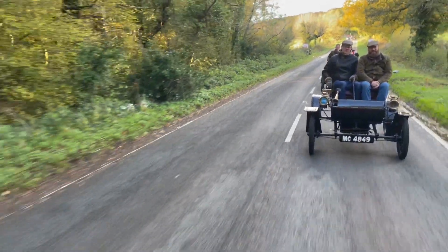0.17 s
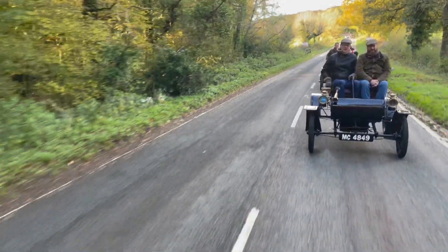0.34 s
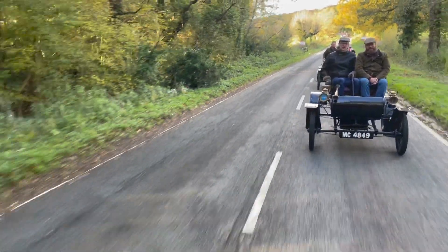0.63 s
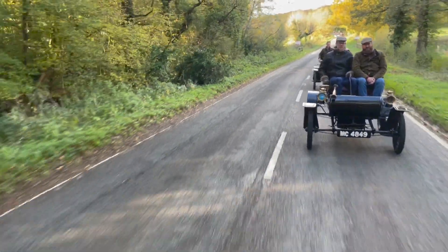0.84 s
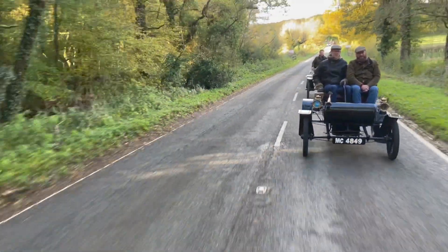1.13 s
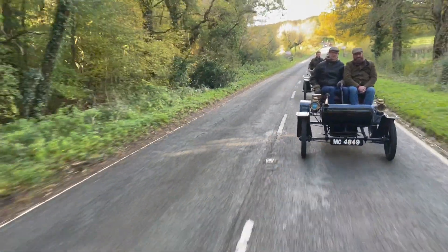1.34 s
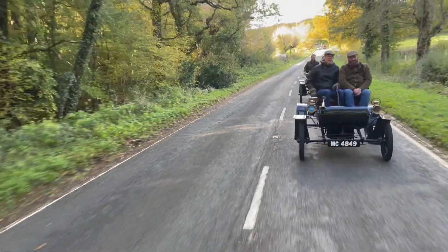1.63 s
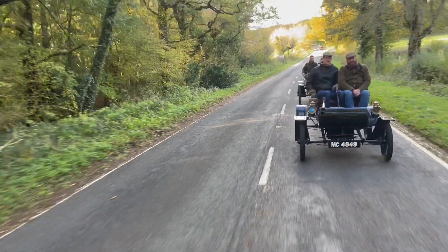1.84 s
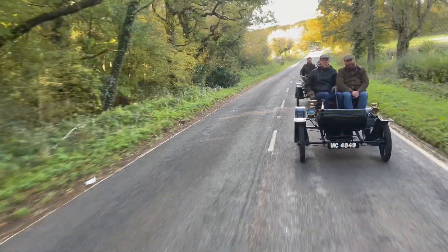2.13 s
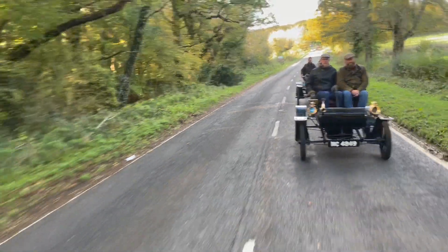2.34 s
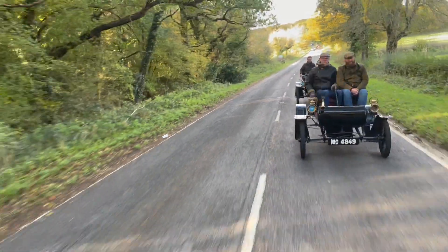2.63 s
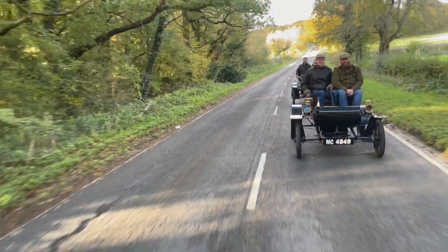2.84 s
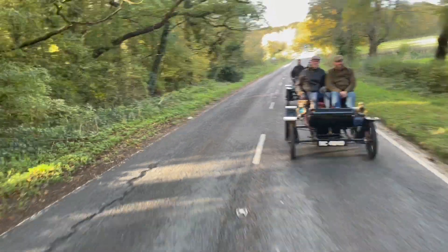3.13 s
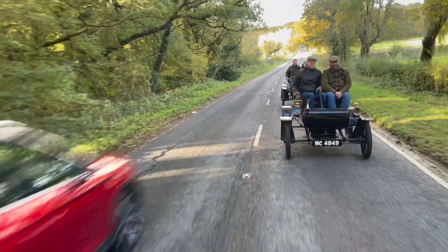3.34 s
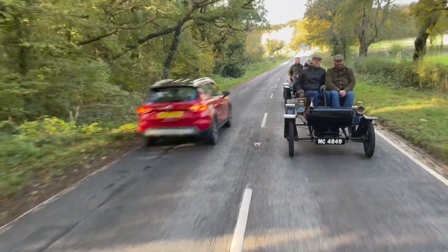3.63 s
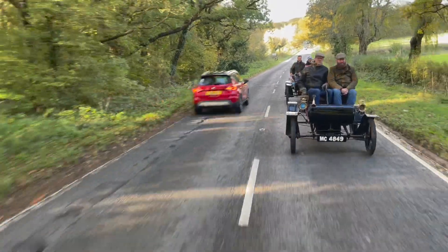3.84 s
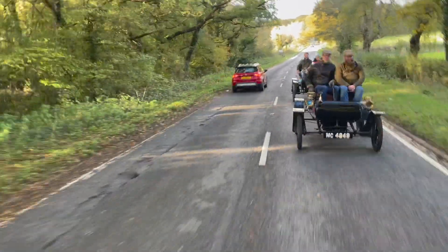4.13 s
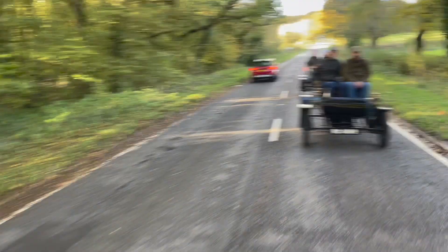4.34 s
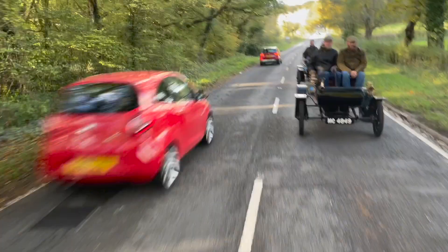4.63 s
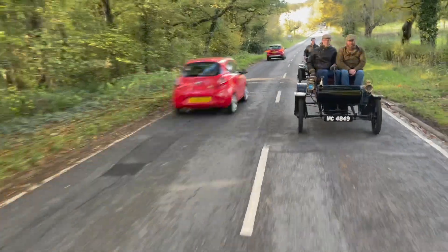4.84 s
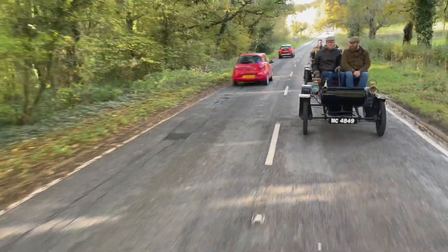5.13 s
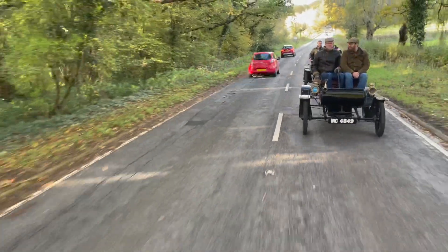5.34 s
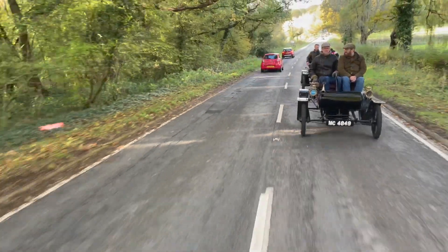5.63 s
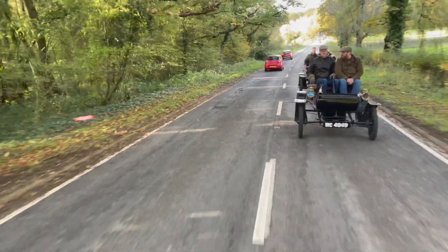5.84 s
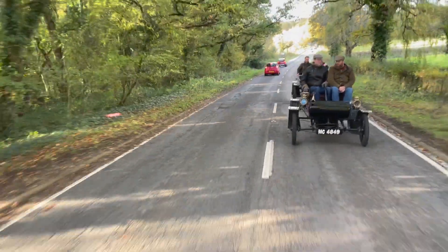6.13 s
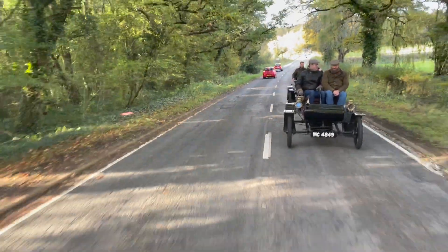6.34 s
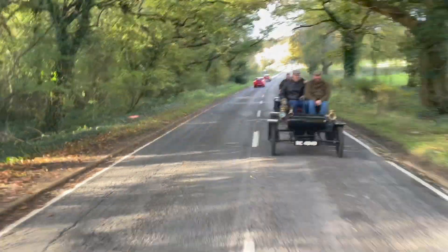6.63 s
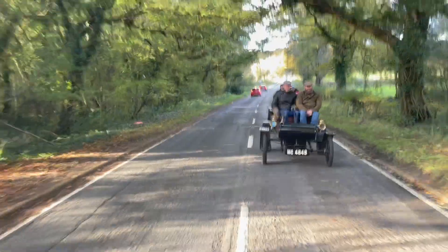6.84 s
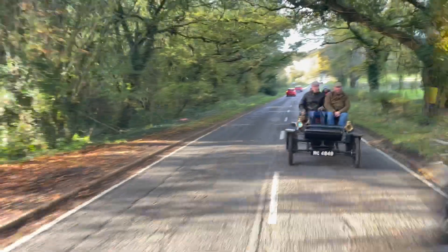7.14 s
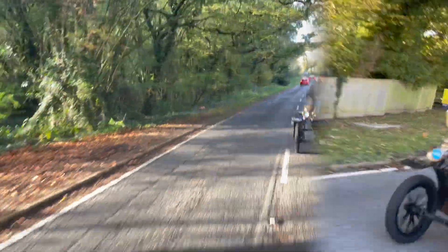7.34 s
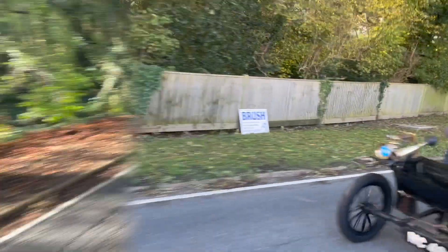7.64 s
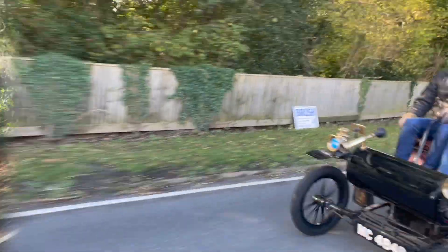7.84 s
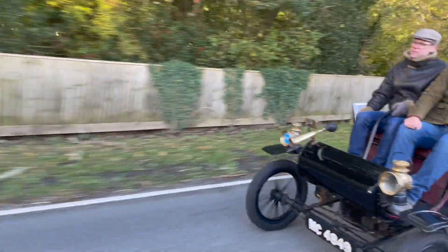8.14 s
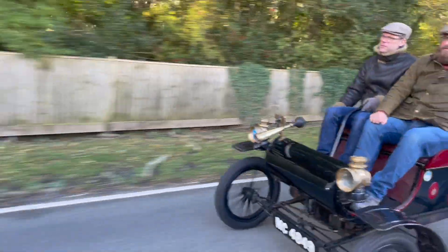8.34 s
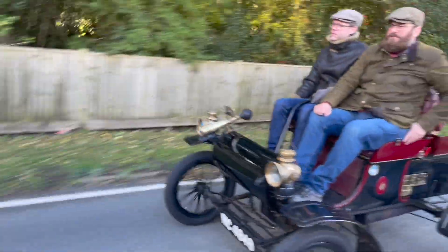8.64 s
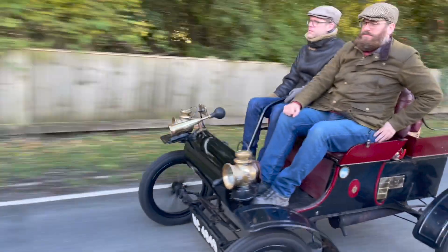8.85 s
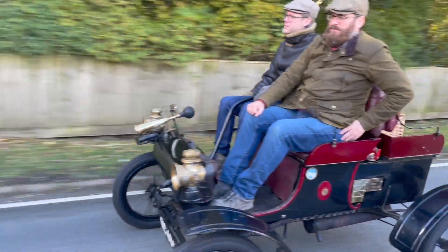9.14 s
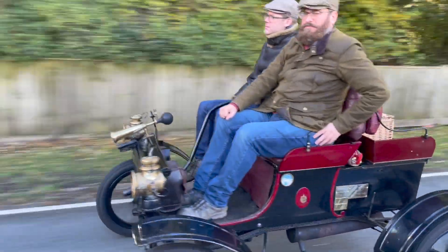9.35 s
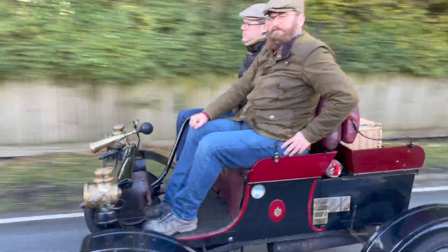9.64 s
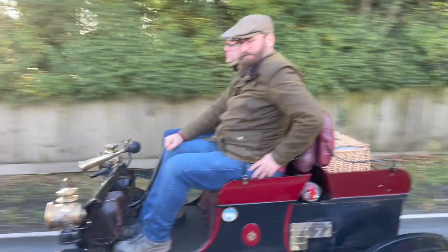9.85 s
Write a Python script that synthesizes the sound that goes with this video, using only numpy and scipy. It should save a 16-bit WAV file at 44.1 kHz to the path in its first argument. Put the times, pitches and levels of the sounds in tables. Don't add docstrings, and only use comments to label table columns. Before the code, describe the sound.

Fast hollow exhaust popping and heavy wind rumble on board an old open car, two passing whooshes, then close crisp chuffs from another vintage engine.

```python
import sys
import numpy as np
from scipy import signal
from scipy.fft import rfft, irfft, next_fast_len
from scipy.io import wavfile
from scipy.ndimage import uniform_filter1d, minimum_filter1d, map_coordinates

SR = 44100
rng = np.random.default_rng(int(sys.argv[2]) if len(sys.argv) > 2 else 0)


def natural_amplitude(level_db):
    exponent = np.asarray(level_db, float) / 20
    return 10 ** exponent


def dump(signal):
    limited = np.clip(np.atleast_2d(signal).T, -1, 1)
    pcm = np.round(limited * 32767).astype(np.int16)
    wavfile.write(sys.argv[1], SR, pcm)


N = 440559

# t/s, firings so far, ring level/dB of the low, high and middle pipe modes
OWN_FIRINGS = [
    [(0.0, -0.45, -27.5, -32, -36), (1.0, 14.47, -30, -32, -33), (2.0, 29.32, -26, -25.5, -36),
     (3.0, 43.98, -30, -27, -37), (4.0, 58.47, -31, -31, -32), (5.0, 72.84, -32, -33, -34),
     (6.0, 87.08, -32, -33, -34), (7.0, 101.29, -34, -33, -36), (7.5, 108.38, -42, -39, -41)],
    [(7.9, 0, -49, -50, -56), (8.2, 4.28, -35, -45, -50), (8.85, 13.55, -34, -42, -48),
     (9.1, 17.11, -46, -44, -50), (9.99, 29.8, -46, -48, -54)],
]
# f/Hz, width/Hz, left-right level/dB, left lead/rad
PIPE_MODES = [
    (895.5, 66, 2, .5),
    (1369, 62, -2, 1.4),
    (1286, 60, -3, 1.1),
]

# t/s, exhaust strokes so far
STROKES = [
    [(0.126, 0), (1.421, 8), (2.74, 16), (4.082, 24), (4.935, 29), (6.162, 36), (6.872, 40), (7.425, 43.01)],
    [(7.561, 0), (7.841, 2), (8.529, 7), (8.935, 10), (9.478, 14), (9.879, 17.01)],
]
# t/s, blast level/dB
NEARNESS = [(0, -36.5), (2.1, -35), (3.1, -42), (4.7, -39), (5.7, -38), (6.7, -41.5), (7.4, -43.5),
            (7.9, -25), (8.12, -23.5), (8.5, -20.5), (9.35, -18), (9.7, -17.5), (9.99, -21)]
# t/s, blast level/dB over the nearness, low bark level/dB
LOADS = [(7.558, 3, -9), (7.698, 2.5, -15), (7.844, 2.5, -9), (7.976, 0, -21), (8.116, 2, -18),
         (8.253, 0.5, -12), (8.392, 0, -9), (8.528, -1, -18), (8.664, -2.5, -6), (8.8, -1, -16),
         (8.937, -0.5, -9), (9.072, -2, -13), (9.208, -3, -7), (9.341, 1, -6), (9.479, -3, -14),
         (9.611, -1, -15), (9.744, -3, -6.5), (9.878, 0, -9)]
# f/Hz, density/dB per Hz
CHUFF = [(400, -11), (900, 1.5), (1600, -4.5), (2300, 4), (3500, -1.5), (5000, 1.5), (6500, -4),
         (8300, 2.5), (11500, -12), (15500, -9)]
# f/Hz, density/dB per Hz
BARK = [(700, -40), (1200, -3), (1900, -4), (2400, -7.5), (3500, 1), (6000, -48)]
STROKE_SCATTER_DB = .3

# t/s, level/dB
WIND = [(0.0, -18.5), (0.35, -23.5), (0.92, -16.5), (1.6, -19.5), (2.1, -20), (2.87, -21), (3.08, -13.5),
        (3.45, -18), (4.3, -19), (5.3, -21), (6.05, -18.5), (6.6, -18), (6.82, -19), (7.1, -24),
        (8.3, -22.5), (8.62, -18.5), (9.1, -19), (9.99, -21.5)]
# t/s, half length/s, buffet level/dB, flutter level/dB
GUSTS = [(0.286, 0.033, 3, 14), (1.296, 0.03, 6, 10), (1.445, 0.083, -4.5, 8), (1.758, 0.019, 5, 14),
         (1.986, 0.1, 3, 4), (2.144, 0.049, 6.5, 10), (2.247, 0.021, 9.5, 2), (3.006, 0.034, -2, -13),
         (3.515, 0.044, 8.5, 10.5), (4.197, 0.026, 11, -11), (4.957, 0.25, 1, -1), (5.358, 0.088, 7, 8),
         (5.44, 0.052, -2.5, -5), (5.562, 0.041, 5.5, 6), (5.713, 0.064, 5, 7), (5.832, 0.027, -2, -13),
         (5.9, .04, 3.5, 4), (5.918, 0.0097, -5, 10), (6.145, 0.017, 8, 5), (6.18, 0.026, -10, -8),
         (6.217, 0.027, -1, 9), (6.287, 0.033, -19, -17), (6.33, 0.024, 5, 4), (6.523, 0.053, 2.5, 9.5),
         (6.688, 0.036, -6, -3), (6.742, 0.018, 5, 8), (7.155, 0.05, 2, 1), (8.583, .05, 4.5, 5),
         (8.738, 0.028, -3, -13), (8.814, 0.024, 4, -7)]
# f/Hz, density/dB per Hz
BUFFET = [(25, -45), (48, -6.5), (68, 1), (95, -2), (125, -5.5), (200, -8), (350, -17.5), (700, -27.5),
          (1500, -58.5)]
# f/Hz, density/dB per Hz
FLUTTER = [(100, -24), (250, 5.5), (500, 4.5), (750, -12), (1100, -48), (2500, -72)]
FLUTTER_DB = -6
# t/s, peak level/dB, f/Hz, crack level/dB
SLAPS = [(0.277, 1, 314, -25), (1.839, -9.5, 323, -9), (2.112, 2, 345, -7), (2.23, -5, 153, -18),
         (3.131, -6, 180, -27), (3.205, -5.5, 367, -27), (3.467, -7.5, 448, -14), (3.556, 0, 151, -15),
         (4.17, -2, 170, -23), (4.619, -2, 143, -14), (5.203, -6, 154, -19), (5.354, 0, 222, -23),
         (5.364, 3, 194, -27), (5.715, 2, 290, -11), (5.921, 2, 188, -32), (6.071, -4, 293, -25),
         (6.132, -10.5, 186, -5), (6.324, -15, 285, -6), (6.483, -6.5, 225, -8), (6.531, -11.5, 496, -12),
         (6.582, -7.5, 322, -10.5), (6.729, -14, 258, -10), (6.8, -4.5, 156, -12), (6.836, -8.5, 222, -9),
         (6.89, -9, 163, -10), (7.149, -9.5, 194, -8), (7.178, -11, 430, -11), (8.319, -16.5, 258, -5),
         (8.601, -2, 189, -20), (9.552, -10, 258, -8)]
# t/s, peak level/dB
KNOCKS = [(0.617, -14), (0.866, -6.5), (0.929, -15), (1.282, 0.5), (1.312, 2), (1.75, -3), (2.007, -1),
          (2.271, -8), (2.338, -4.5), (2.6, -4), (2.927, -14), (5.305, -32), (5.73, -1), (7.457, -15),
          (7.561, -14), (6.2, -18), (5.517, -10), (5.663, -7.5), (5.767, -20), (5.835, -7), (6.389, -8.5),
          (6.44, -5), (6.938, -11), (7.129, -13), (8.415, -9), (8.458, -8), (8.63, -7), (8.737, -9.5),
          (8.805, -7), (9.379, -7.5)]
KNOCK_HZ, KNOCK_CRACK_DB = 258, -28.5
TEAR_DB, TEAR_GROWS, TEAR_LUMPS_DB = -35, 1.14, 4.5
RATTLE_S, RATTLE_HALF_S, RATTLE_DB = 7.2, .5, 4.5
# t/s, peak level/dB, fall/octaves
WHIPS = [(1.282, -15, 1.3), (1.748, -14, 2.2), (2.006, -7, 2.6), (2.111, -5, 2.2), (2.598, -14, 2.6),
         (3.065, -9, 2.5), (3.131, -18, 2.6), (3.206, -5, 2.6), (4.166, -18, 2.5), (5.539, -10, 2.5),
         (5.633, -20, 2.6), (5.718, 5, 2.6), (5.769, -7, 2.4), (5.836, -23, 2.6), (5.919, -8, 2.6),
         (6.071, -12, 2.6), (6.097, -18, 2), (6.139, -9, 2.6), (6.147, -8, 3), (6.196, -17, 2.6),
         (6.215, -16, 2.6), (6.317, -15, 2.6), (6.336, -10, 2.6), (6.392, -12, 2.6), (6.439, -12, 2.6),
         (6.486, -10, 2.6), (6.532, -7, 2.5), (6.578, -20, 2.6), (6.614, -11, 2.66), (6.726, -11, 2.6),
         (6.732, -7, 2.6), (6.74, -9, 3), (6.778, -13.5, 2.6), (6.802, -10, 2.5), (6.834, -16, 2.9),
         (6.865, -14, 2.6), (6.889, -11, 2.6), (6.94, -13, 2.7), (7.012, -15, 2.6), (7.129, -10, 2.6),
         (7.151, -15, 2.6), (7.179, -10, 2.6), (8.632, -6.5, 2.13)]
WHIP_END_HZ, WHIP_FALL_S, WHIP_RISE_S, WHIP_DIES_S = 170, 0.0059, 0.001, 0.0036

# t/s when closest, tyre fizz level/dB, body roar level/dB
PASSING = [
    (3.249, -30.5, -22.5),
    (4.405, -28, -19),
]
# f/Hz, density/dB per Hz
FIZZ = [(800, -27.5), (2500, 2), (4500, -8), (8000, -9.5), (14000, -20)]
# f/Hz, density/dB per Hz
WAKE = [(200, -3), (600, 5), (1000, 7), (1500, -8.5), (3000, -40)]

# t/s, half length/s, f/Hz, level/dB
GROAN = [
    (8.32, .014, 500, -24),
    (8.36, 0.029, 600, -24.5),
    (8.4, 0.023, 545, -29),
    (8.44, 0.032, 485, -33),
    (8.36, 0.033, 262, -18),
    (8.43, 0.052, 258, -20),
]
# t/s, boom level/dB, heave level/dB
BODY = [(0, -30.5, -44), (.7, -21, -45), (1.1, -19, -43), (1.5, -27, -41), (2.1, -16.5, -24),
        (2.6, -25, -31), (3.1, -18.5, -30), (3.7, -22.5, -39), (4.1, -18, -27.5), (5, -17.5, -31),
        (5.5, -21.5, -31), (6.05, -17.5, -29), (6.3, -27.5, -30), (7.2, -31, -40), (8.2, -30.5, -31),
        (8.55, -25, -32), (9.1, -38, -34), (9.99, -41, -33)]
# f/Hz, density/dB per Hz
HEAVE = [(15, -30), (30, 1), (48, 12.5), (62, 11.5), (90, -38.5)]
BOOM_HZ, BOOM_WIDTH_HZ = 101, 30

# t/s, hum level/dB
ROAD_HUM = [(0.0, -26.5), (0.8, -23), (1.08, -33), (1.61, -25), (2.03, -26), (2.64, -27), (3.2, -29),
            (4.67, -29), (5.09, -29), (5.56, -52), (5.8, -22.5), (6.3, -33), (7.96, -46), (8.29, -43),
            (8.54, -26.5), (9.43, -38), (9.68, -29.5), (9.99, -30.5)]
# f/Hz, width/Hz, level/dB
PANELS = [
    (259, 47, -1.5),
    (507, 120, -12.5),
]
# f/Hz, density/dB per Hz
TYRES = [(150, -10), (500, 5), (900, -0.5), (1150, 0.5), (1400, -2.5), (1700, -3), (2100, -6),
         (2800, -13.5), (4000, -26), (8000, -37)]
# f/Hz, density/dB per Hz
HISS = [(600, -10.5), (2000, 1.5), (3500, 2.5), (5000, -2), (6500, -1.5), (8300, 6), (11500, -12.5),
        (15500, -5)]
ROAR_DB, HISS_DB = (-34, -35.5), (-36.5, -31)
HISS_FADES_DB_PER_S, DISSOLVE_SAG_DB = -0.55, -6.5
DISSOLVE_S = (7.39, 8.05)
# f/Hz, density/dB per Hz
SIDE_ROAR = [(250, -30), (450, -5), (600, 3), (900, -4), (1300, -26)]
SIDE_ROAR_DB, SIDE_ROAR_LEAD_RAD = -28.5, 2.2

# f/Hz, likeness
ALIKE = [(60, .93), (260, .86), (600, .42), (1400, .6), (2100, .62), (2900, .25), (4000, .25), (5000, .48),
         (7200, .7), (7900, .995), (8700, .985), (9200, .65), (10100, .6), (10600, .995), (12400, .99),
         (13100, .45), (14200, .97)]
# f/Hz, left lead/rad
LEAD = [(0, 0), (340, 0.2), (700, .2), (1400, 1.5), (1720, 1.5), (2070, 0.2), (3100, 1.0), (3500, .4),
        (5300, .45), (6030, -.4), (7060, -1.65), (7800, -3.14), (8750, -3.14), (10200, -5.3),
        (10600, -6.28), (12600, -6.28), (13260, -7.9), (14000, -9.42), (16000, -9.42)]
# f/Hz, left-right level/dB
LEAN = [(60, 0.3), (110, -0.3), (200, -0.5), (380, 0), (700, 3.5), (1290, 0), (2380, 1.5), (4390, 3.5),
        (6500, 3.5), (7700, 0), (15000, 0)]
# f/Hz, level/dB
PORT = [(6800, 0), (7700, -3), (8900, -3), (10000, 0), (11500, 1.5), (12800, 0), (14000, -3.5)]
ABEAM_HZ = 5300
# t/s, depth level/dB, recovery/s
DUCKS = [
    (2.12, -4, 1),
    (3.3, -1, 0.5),
    (3.95, -3, 0.47),
    (5.72, -9, 0.2),
    (5.92, -2.5, 0.73),
]
DUCK_S = 0.025


def unit(x):
    return x / np.sqrt(np.mean(x ** 2) + 1e-20)


def along(points, hz):
    f, v = np.transpose(points)
    return np.interp(np.log(hz + 1), np.log(f + 1), v)


def shaped(points):
    return lambda hz: natural_amplitude(along(points, hz))


def curves(rows):
    s, *cols = np.transpose(rows)
    return [np.interp(np.arange(N) / SR, s, c) for c in cols]


def wobble(rate):
    knots = rng.standard_normal(int(N * rate / SR) + 4)
    return map_coordinates(knots, [np.arange(N) * rate / SR])


def whole_turns(s, turns):
    return np.interp(np.arange(np.ceil(turns[0]), turns[-1]), turns, s)


def filtered(x, response):
    m = next_fast_len(N + 8192)
    return irfft(rfft(x, m) * response(np.fft.rfftfreq(m, 1 / SR)), m)[..., :N]


def resonance(f, hz, width):
    return 1j * f * width / (hz * hz - f * f + 1j * f * width)


def rush(spectrum, patchy_db, closer=0., grain_db=0., ahead=False, aside=0.):
    grain = natural_amplitude(grain_db * wobble(700))
    z = signal.stft(rng.standard_normal((2, N)) * grain, nperseg=512)[2]
    field = uniform_filter1d(rng.standard_normal(z.shape[1:]), size=5, axis=0)
    field = uniform_filter1d(field, size=8, axis=1)
    pair = signal.istft(z * natural_amplitude(patchy_db * unit(field)), nperseg=512)[1]
    m = next_fast_len(N)
    a, b = rfft(pair, m)
    hz = np.fft.rfftfreq(m, 1 / SR)
    alike = along(ALIKE, hz)
    turn = np.arccos(np.clip(alike + closer * (alike < .9), 0, 1)) / 2
    a, b = np.array([a * np.cos(turn), b * np.sin(turn)]) * spectrum(hz) * natural_amplitude(along(PORT, hz))
    lead = np.interp(hz, *np.transpose(LEAD))
    if ahead:
        lead = lead * np.clip(hz / ABEAM_HZ, 0, 1) ** 2
    tilt = natural_amplitude(along(LEAN, hz) / 2) * np.exp(.5j * (lead + aside))
    return unit(irfft(np.array([(a + b) * tilt, (a - b) / tilt]), m)[:, :N])


def own_engine():
    kicks = np.zeros((len(PIPE_MODES), N + SR))
    reflections = [(.003, 0.23), (.0058, 0.69), (.0105, .45), (.016, 0.27)]  # delay/s, share
    for shot in OWN_FIRINGS:
        times = whole_turns(*np.transpose(shot)[:2]) - .0085
        luck = rng.standard_normal((len(times), 12))
        at = np.round((times + 0.000856 * luck[:, 0]) * SR).astype(int)
        size = natural_amplitude(np.array(curves(shot))[1:, at] + 1.5 * luck.T[1:4])
        kicks[:, at] += size * [[1.15], [.55], [.9]]
        for k, (late, share) in enumerate(reflections):
            echo = at + np.round((late + 0.00041 * luck[:, 4 + k]) * SR).astype(int)
            ragged = share * (1 + .2 * luck[:, 8 + k])
            kicks[:, echo] += size * ragged * [[.25], [1.0], [.5]]
    out = 0
    for (hz, width, lean_db, lead), kick in zip(PIPE_MODES, kicks):
        side = natural_amplitude(lean_db / 2) * np.exp(.5j * lead)
        sides = [[side], [1 / side]]
        mode = lambda f: resonance(f, hz, width) * resonance(f, hz, 4.5 * width) * sides
        out = out + natural_amplitude(76.5) / np.sqrt(width) * filtered(kick[:N], mode)
    return out


def other_engine():
    gate = np.zeros((2, N + SR))
    t = np.arange(SR // 8) / SR
    blast = np.clip(t / 0.0022, 0, 1) / (1 + (t / 0.029) ** 6.4)
    trail = 0.37 * np.exp(-((t - .052) / 0.033) ** 2)
    times = np.concatenate([whole_turns(*np.transpose(shot)) for shot in STROKES])
    levels = np.interp(times, *np.transpose(NEARNESS)) + STROKE_SCATTER_DB * rng.standard_normal(len(times))
    at, load_db, bark_db = np.transpose(LOADS)
    for s, db in zip(times, levels):
        more = np.interp(s, at, load_db)
        low = np.interp(s, at, bark_db)
        stroke = np.array([natural_amplitude(more) * blast + trail, natural_amplitude(low) * blast])
        gate[:, round((s - .003) * SR):][:, :len(t)] += natural_amplitude(db + 1.5) * stroke
    rasp = natural_amplitude(1.7 * wobble(260))
    gas = rush(shaped(CHUFF), patchy_db=1.9, closer=0.45, grain_db=1.6, ahead=True)
    bark = rush(shaped(BARK), patchy_db=1.5, closer=0.15, grain_db=2, ahead=True)
    return rasp * (gate[0, :N] * gas + gate[1, :N] * bark)


def wind():
    strength_db, = curves(WIND)
    now = np.arange(N) / SR
    swells = sum(np.outer(db, np.exp(-((now - s) / half) ** 2)) for s, half, *db in GUSTS)
    buffet_db, flutter_db = strength_db + swells + [[0], [FLUTTER_DB]]
    lumps = wobble(28)
    buffet = natural_amplitude(buffet_db) * unit(natural_amplitude(2.3 * lumps) * rush(shaped(BUFFET), patchy_db=1.5))
    ripples = natural_amplitude(1.1 * lumps + 1.7 * wobble(70))
    flutter = natural_amplitude(flutter_db - 2.5) * unit(ripples * rush(shaped(FLUTTER), patchy_db=1.2))

    thumps, bursts = np.zeros((2, N + SR)), np.zeros(N + SR)
    t = np.arange(SR // 16) / SR
    knocks = [(s, db, KNOCK_HZ, KNOCK_CRACK_DB - db) for s, db in KNOCKS]
    for s, db, hz, crack_db in SLAPS + knocks:
        pitch = hz * (0.546 + 1.32 * np.exp(-t / 0.0043))
        phase = rng.random() + 0.095 * rng.standard_normal((2, 1))
        swirl = np.sin(2 * np.pi * (np.cumsum(pitch) / SR + phase))
        thump = (t / 0.0046) ** 2 * np.exp(2 - t / 0.0021)
        burst = (t / 0.0049) ** 2 * np.exp(2 - t / 0.0022)
        thumps[:, round(s * SR):][:, :len(t)] += natural_amplitude(db - 0.5) * thump * swirl
        bursts[round(s * SR):][:len(t)] += natural_amplitude(db + crack_db + 1.5) * burst

    rattle_db = RATTLE_DB * np.exp(-((now - RATTLE_S) / RATTLE_HALF_S) ** 2)
    tear_db = TEAR_DB + TEAR_GROWS * (flutter_db + 17.5) + TEAR_LUMPS_DB * wobble(80)
    tear = natural_amplitude(tear_db + rattle_db)
    bright = lambda f: np.abs(resonance(f, 680, 1000)) ** 2.6 / (1 + (f / 1500) ** 4)
    crack = rush(bright, patchy_db=-3.5, closer=0.58)
    return buffet + flutter + thumps[:, :N] + (bursts[:N] + tear) * crack


def whips():
    out = np.zeros((2, N + SR))
    t = np.arange(SR // 20) / SR
    luck = rng.random((len(WHIPS), 2))
    for (s, db, octaves), (turn, skew) in zip(WHIPS, luck):
        pitch = WHIP_END_HZ * 2 ** (octaves * np.exp(-t / WHIP_FALL_S))
        phase = turn + 0.075 * skew * np.array([[1], [-1]])
        swirl = np.sin(2 * np.pi * (np.cumsum(pitch) / SR + phase))
        shape = (1 - np.exp(-t / WHIP_RISE_S)) * np.exp(-t / WHIP_DIES_S)
        out[:, round((s - .001) * SR):][:, :len(t)] += natural_amplitude(db + 2.5) * shape * swirl
    return out[:, :N]


def oncoming():
    t = np.arange(N) / SR
    fizz, wake = 0, 0
    for s, fizz_db, wake_db in PASSING:
        after = t - s + .015
        fizz = fizz + natural_amplitude(fizz_db) / (1 + (after / np.where(after < 0, .03, .07)) ** 2)
        wake = wake + natural_amplitude(wake_db) / (1 + ((t - s - .08) / 0.19) ** 2)
    fizz = fizz * rush(shaped(FIZZ), patchy_db=0.0)
    return fizz + wake * rush(shaped(WAKE), patchy_db=0.5, closer=-0.31)


def spring():
    t, out = np.arange(N) / SR, 0
    for s, half, hz, db in GROAN:
        waver = 1 + .025 * wobble(70)
        rough = natural_amplitude(3.5 * wobble(60))
        tone = np.sin(2 * np.pi * np.cumsum(hz * waver) / SR)
        out = out + natural_amplitude(db) * rough * np.exp(-((t - s) / half) ** 2) * tone
    return np.sqrt(2) * out * natural_amplitude([[.8], [-.8]])


def body():
    boom_db, heave_db = curves(BODY)
    ring = lambda f: np.abs(resonance(f, BOOM_HZ, BOOM_WIDTH_HZ)) ** 2
    boom = natural_amplitude(boom_db - 2.0 + 0.8 * wobble(9.1)) * rush(ring, patchy_db=-1.3)
    return boom + natural_amplitude(heave_db - 1.5) * rush(shaped(HEAVE), patchy_db=0.8)


def road():
    t = np.arange(N) / SR
    later = np.interp(t, DISSOLVE_S, [0, 1])
    sag_db = DISSOLVE_SAG_DB * np.exp(-((t - DISSOLVE_S[1] + 0.28) / 0.42) ** 2)
    roar_db = np.interp(later, [0, 1], ROAR_DB) + sag_db
    hiss_db = (1 - later) * (HISS_DB[0] + HISS_FADES_DB_PER_S * t) + later * HISS_DB[1]
    hum_db, = curves(ROAD_HUM)
    surface = wobble(7)
    roar = natural_amplitude(roar_db + 9.5 + 0.4 * surface) * rush(shaped(TYRES), patchy_db=1.04)
    hiss = natural_amplitude(hiss_db + 5.0 + 0.45 * surface) * rush(shaped(HISS), patchy_db=1.6)
    panels = lambda f: np.abs(sum(natural_amplitude(db) * resonance(f, hz, width) ** 2 for hz, width, db in PANELS))
    hum = natural_amplitude(hum_db + 2.0) * rush(panels, patchy_db=0.5)
    return roar + hiss + hum


def side_roar():
    later = np.interp(np.arange(N) / SR, [DISSOLVE_S[1] - .2, DISSOLVE_S[1] + 0.27], [0, 1])
    return natural_amplitude(SIDE_ROAR_DB) * later * rush(shaped(SIDE_ROAR), patchy_db=0.5, closer=0.35, aside=SIDE_ROAR_LEAD_RAD)


def gain_control():
    t, gain_db = np.arange(N) / SR, 0
    for s, db, back in DUCKS:
        since = np.clip(t - s, 0, None)
        gain_db = gain_db + db * (1 - np.exp(-since / DUCK_S)) * np.exp(-since / back)
    return natural_amplitude(gain_db)


def scene():
    steady = own_engine() + other_engine() + road() + oncoming()
    return gain_control() * steady + wind() + spring() + whips() + body() + side_roar()


def low_pass(x):
    return signal.sosfilt(signal.butter(12, 15870, fs=SR, output="sos"), x)


def record(dry):
    need = np.minimum(1, .92 / (np.abs(dry).max(axis=0) + 1e-9))
    soft = dry * uniform_filter1d(minimum_filter1d(need, size=440), size=440)
    return low_pass(soft)


dry = scene()
out = record(dry)
dump(out)
```